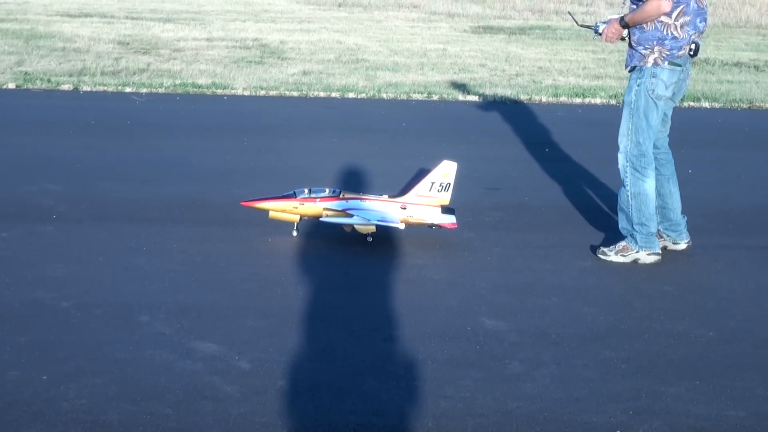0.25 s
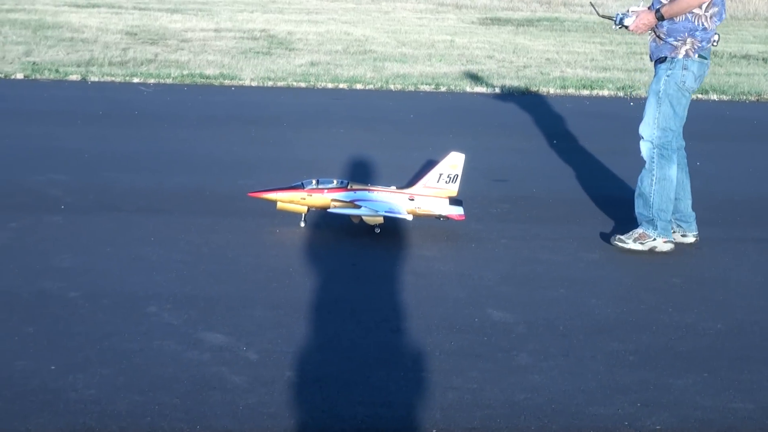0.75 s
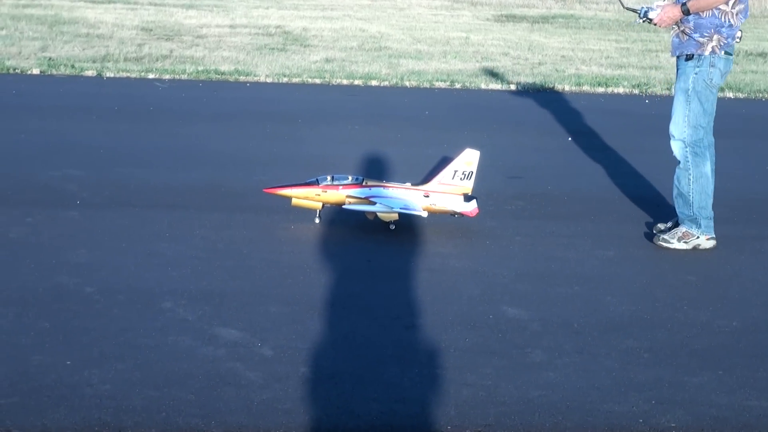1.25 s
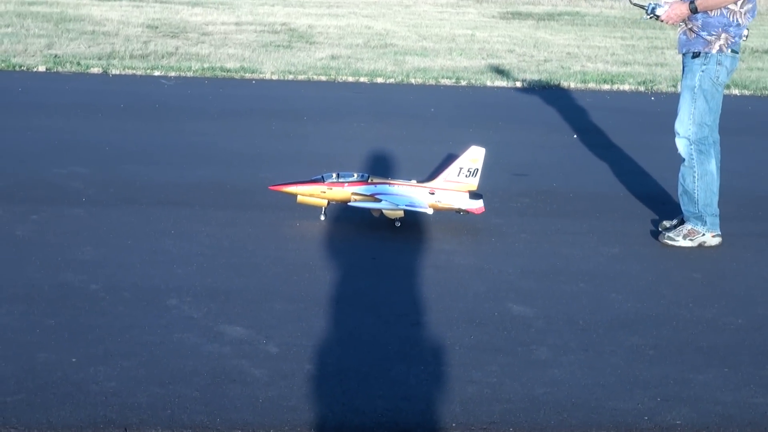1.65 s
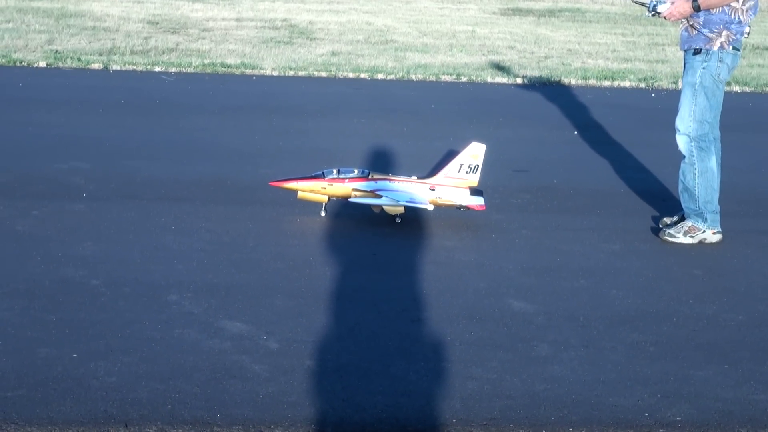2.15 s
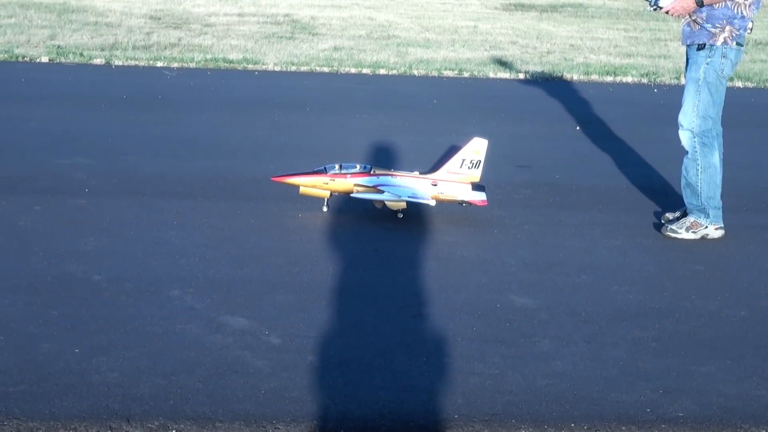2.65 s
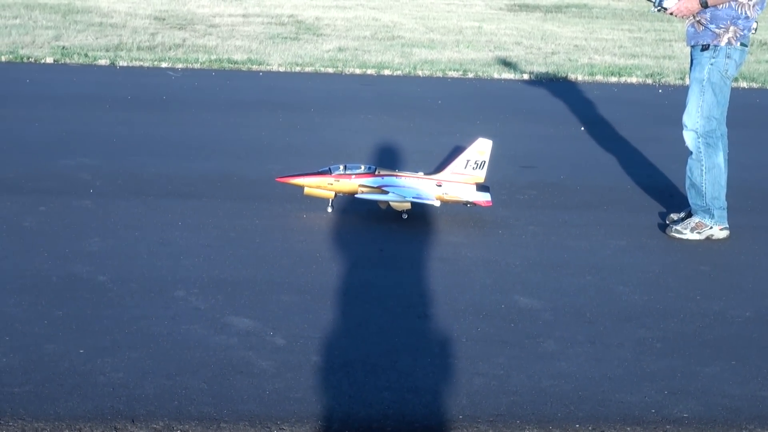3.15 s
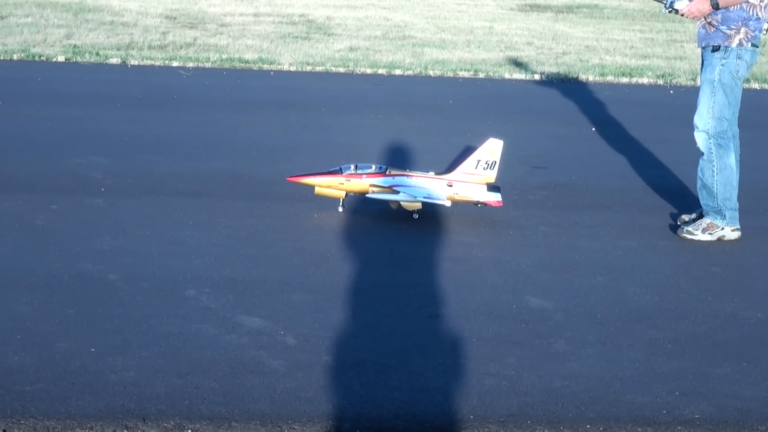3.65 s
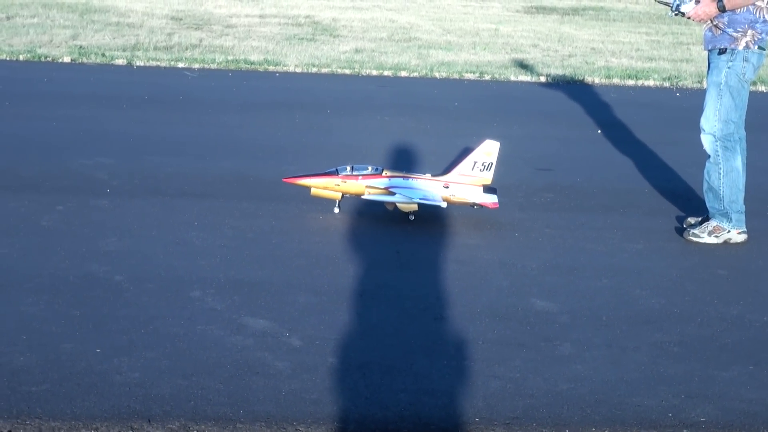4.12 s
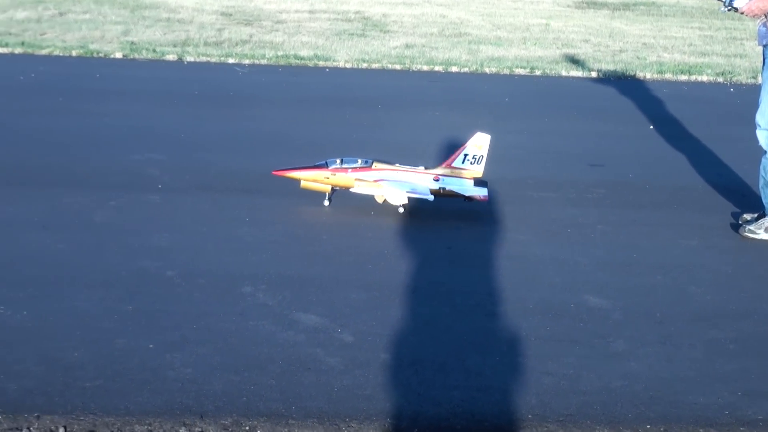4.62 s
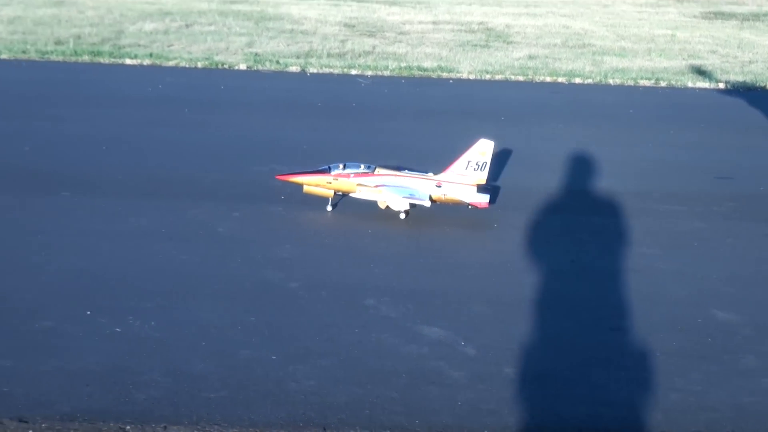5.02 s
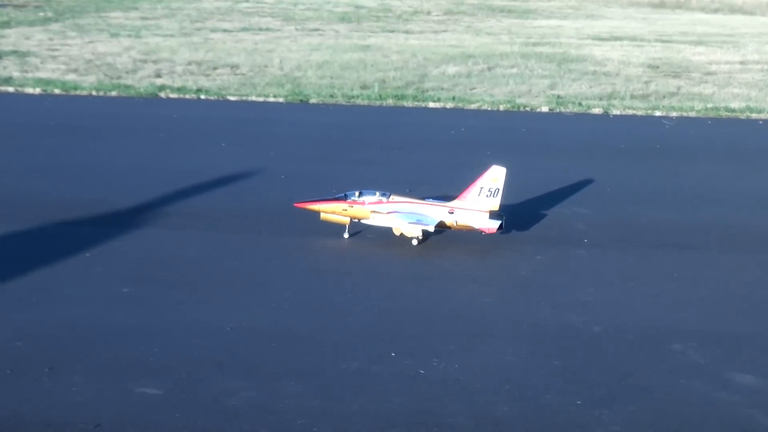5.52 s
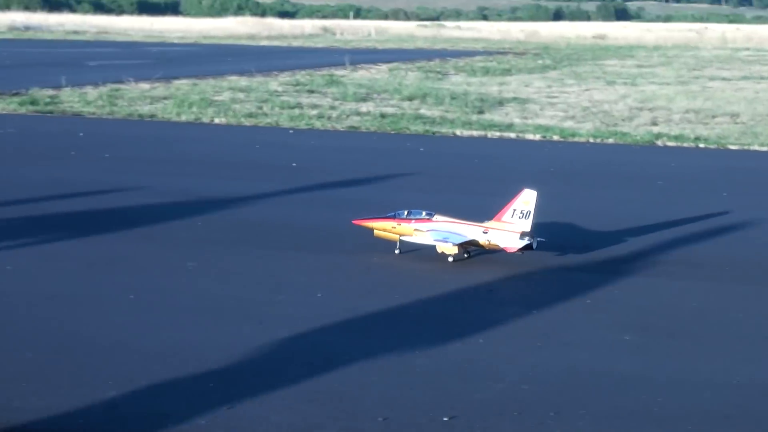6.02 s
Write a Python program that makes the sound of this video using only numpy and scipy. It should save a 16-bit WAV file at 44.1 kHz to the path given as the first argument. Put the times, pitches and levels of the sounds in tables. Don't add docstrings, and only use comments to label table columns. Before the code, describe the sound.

Tiny servos whirr in short bursts over a quiet field, then a model jet's motor chirps and its ducted fan spools into a rising hissing whine.

```python
import sys
import numpy as np
from scipy import signal
from scipy.fft import rfft, irfft, next_fast_len
from scipy.io import wavfile
from scipy.ndimage import uniform_filter1d, map_coordinates

SR = 44100
rng = np.random.default_rng(int(sys.argv[2]) if len(sys.argv) > 2 else 0)


def master_out(mix):
    frames = np.transpose(np.atleast_2d(mix))
    ceiling = np.clip(frames, -1, 1)
    pcm = np.round(ceiling * 32767).astype(np.int16)
    wavfile.write(sys.argv[1], SR, pcm)


def invert_db(level):
    return 10 ** (np.asarray(level, dtype=float) / 20)


N = 276948

# t/s, shaft f/Hz, unbalance level/dB, blade tone level/dB
FAN_RUN = [(3.66, 214.4, -57, -56), (3.73, 266.3, -44.5, -41.5), (3.81, 302.8, -47, -35.5),
           (3.97, 324, -40.5, -37), (4.16, 331.8, -41, -37), (4.27, 375, -38, -38.5),
           (4.4, 408.7, -36, -28.5), (4.56, 420.8, -43, -30.5), (4.72, 439.7, -36.5, -37.5),
           (4.87, 480, -36, -29), (5.02, 519.5, -46, -34), (5.33, 561.5, -28.5, -31), (5.57, 589, -34, -43),
           (5.68, 609, -30, -36), (5.78, 634.5, -19.5, -32), (6.0, 653.8, -19.5, -32.5),
           (6.07, 692, -20, -32), (6.28, 702.6, -21.5, -33.5)]
# shaft multiple, level at full speed/dB, growth/dB per dB of speed
SHAFT_ORDERS = [(2, -48, 2.5), (3, -50, 2), (4, -55, 1.5), (7, -56, 1), (10, -48, 2), (15, -50, 2),
                (20, -54, 1.8), (25, -58, 1.5), (30, -58, 1.2)]
# shaft multiple, shaft f/Hz, width/Hz, level/dB
CRITICAL_SPEEDS = [(2, 388, 45, -47), (2, 450, 27.5, -41.5), (2, 510, 36, -39.5), (2, 562, 43, -47),
                   (2, 605, 31.5, -36.5), (2, 637, 18.5, -37.5), (2, 697, 30, -41.5), (3, 279, 54, -40.5),
                   (3, 401.5, 20, -42.5), (3, 449, 46, -38), (3, 541, 91, -36.5), (3, 620, 70.5, -40),
                   (3, 698, 30, -40.5), (4, 324, 13, -47), (4, 438, 33, -43), (4, 548, 45, -36),
                   (4, 704, 14, -40), (7, 697, 24, -42.5), (10, 374, 18, -45.5), (10, 484, 40, -48),
                   (10, 604, 43, -38), (10, 643, 23, -35), (10, 698, 37, -37), (15, 491, 73, -44.5),
                   (15, 569, 16, -43), (15, 607, 30, -34), (15, 695, 82, -35.5), (20, 437, 24, -52),
                   (20, 570, 90, -46.5), (20, 697, 30, -50)]
# shaft multiple, level against the hiss/dB
UNEVEN_BLADES = [(6, -21), (9, -22.5), (11, -19), (13, -19), (14, -17), (18, -21)]
# f/Hz, width/Hz, level/dB
AIRFRAME_MODES = [(799, 176, 9), (1388, 230, 6.5), (3380, 990, -23), (4690, 550, -3.5)]
# f/Hz, width/Hz, level/dB
INTAKE_MODE = [(2280, 520, 0)]
# f/Hz, level/dB per Hz
ROAR_COLOUR = [(120, -42), (300, -2.5), (600, -3), (1000, 0.5), (3000, 1), (5500, -8), (8000, -33)]
# f/Hz, level/dB per Hz
HISS_COLOUR = [(2060, -24), (3500, 2), (4190, -9.5), (4890, -5.5), (5420, -14), (6010, -3.5), (6830, -8),
               (7470, -3.5), (8180, -7.5), (9060, -5.5), (10200, -4.5), (12600, -9.5), (15800, -30),
               (16300, -35)]
# f/Hz, level/dB per Hz
TYRE_COLOUR = [(80, -60), (130, -6), (250, 0), (450, -3), (800, -30)]
# t/s, shaft f/Hz, commutation whistle level/dB, its half-frequency level/dB
MOTOR_RUN_UP = [(3.54, 58, -41, -58), (3.578, 107, -42, -50), (3.606, 147, -28, -43),
                (3.627, 167, -45, -47), (3.652, 190, -38, -36), (3.67, 210, -68, -60),
                (3.692, 235, -56, -42), (3.732, 262, -45, -64), (3.75, 273, -66, -66)]
# start t/s, end t/s, f/Hz, level/dB, octave level/dB
SWITCHING_STEPS = [
    (3.475, 3.536, 2965, -52, -48),
    (3.536, 3.556, 3060, -38, -47),
    (3.556, 3.583, 3352, -31, -56),
    (3.575, 3.597, 3895, -41, -57),
    (3.595, 3.62, 4950, -37, -55),
    (3.617, 3.638, 7440, -48, -80),
]
# start t/s, end t/s, start f/Hz, end f/Hz, level/dB
BEAT_WHISTLES = [(3.505, 3.54, 2800, 2600, -38), (3.51, 3.555, 2280, 2100, -39),
                 (3.618, 3.64, 4620, 4200, -43), (3.6, 3.62, 2240, 2200, -36), (3.6, 3.64, 1545, 1585, -38),
                 (3.505, 3.545, 1490, 1540, -40), (3.52, 3.66, 765, 782, -43),
                 (3.617, 3.638, 6400, 6300, -54), (3.535, 3.556, 12240, 12240, -58),
                 (3.63, 3.65, 11700, 11600, -59), (3.475, 3.487, 2780, 2700, -46),
                 (3.59, 3.598, 6200, 6200, -50)]
# t/s, hold/s, level/dB, release/dB per s
ROTOR_KICKS = [
    (3.475, .004, -42, 800),
    (3.505, .135, -37.5, 500),
]
# f/Hz, level/dB per Hz
JUDDER_SPECTRUM = [(500, -40), (750, -9), (1400, -1), (2500, -1.5), (4700, -6), (6000, -19), (7300, -22),
                   (8800, -10.5), (10200, -22), (11800, -12), (15000, -40)]
# start t/s, full speed t/s, end t/s, top gear mesh f/Hz, level/dB
SERVO_STROKES = [
    (-.04, .03, .082, 3350, -52),
    (.6, .664, .715, 3080, -53.5),
    (.752, .809, .893, 5020, -51.5),
    (.972, 1.03, 1.108, 5020, -52.5),
    (1.127, 1.181, 1.272, 3470, -52),
    (1.37, 1.445, 1.555, 5300, -51.5),
    (1.635, 1.70, 1.78, 5200, -53),
    (1.805, 1.855, 1.895, 3990, -55),
]
# multiple, level/dB
MESH_HARMONICS = [(1, 2.5), (2, 10), (3, 3), (4, -9), (5, -13)]
# f/Hz, width/Hz, level/dB
CASE_MODES = [(2200, 250, -9), (3450, 220, -6), (4400, 250, -4), (4980, 220, 1), (6300, 350, 1),
              (7050, 350, -2), (9400, 600, -2), (10200, 400, -4), (11600, 450, -8), (12700, 500, -9)]
# f/Hz, width/Hz, level/dB
LINKAGE_MODES = [(670, 980, 2.5), (1330, 570, 8.5), (2080, 130, 2), (2650, 150, -17)]
# t/s, peak level/dB
FLAP_STOPS = [
    (1.482, -41.5),
    (1.7714, -44),
    (1.8776, -41),
]
# f/Hz, level/dB
ENGINE_TONES = [(117.8, 0), (236, -13), (353, -11), (471, -12), (511, -19), (550, -21)]
# t/s, lowest tone level/dB, left minus right/dB
ENGINE_LEVEL = [(0, -50, 0.1), (1.5, -53, 0.5), (3.5, -53, 0), (4.16, -48.5, 1.5), (4.9, -50.5, 1.5),
                (5.63, -48, 2), (6, -48, 8), (6.28, -51, 7)]
# start t/s, end t/s, f/Hz, width/Hz, level/dB
INSECTS = [
    (0, 1, 1650, 30, -75),
    (.3, 1.3, 3050, 160, -80),
    (0, .6, 2880, 120, -81),
    (1.6, 3.5, 2832, 25, -78),
    (1.9, 3.5, 5665, 60, -85),
    (2.7, 3.5, 5810, 80, -85),
]
# f/Hz, level/dB per Hz
HUSH_COLOUR = [(25, -11), (60, -4.5), (100, 2), (170, 2), (300, -0.5), (470, 0.5), (700, -4.5),
               (1500, -10.5), (2900, -16), (4700, -20), (11000, -25.5), (13000, -21.5), (16300, -28)]
# f/Hz, correlation
PORT_LIKENESS = [(130, .999), (290, .93), (640, .6), (1200, .02), (16000, .02)]
# t/s, left minus right/dB
JET_PAN = [(0, -.8), (3.5, -1), (6.3, -1.2)]
# f/Hz, level against the common part/dB
GROUND_SCATTER = [(100, -14), (250, -17), (500, -29), (800, -28), (2400, -25), (5000, -21), (9000, -17)]


def fan():
    shaft, unbalance_db, blade_db, gate = curves(FAN_RUN)
    speed_db = 20 * np.log10(shaft / 700)
    roar_db, hiss_db = -35.5 + 1.8 * speed_db, -32 + 2.85 * speed_db
    tones = rotor_tones(shaft, speed_db, unbalance_db, blade_db, hiss_db)
    air = duct_roar(roar_db) + blade_hiss(shaft, hiss_db) + intake(roar_db)
    return gate * tones + air_on() * air


def rotor_tones(shaft, speed_db, unbalance_db, blade_db, hiss_db):
    sizes = [(1, invert_db(unbalance_db)), (5, invert_db(blade_db))]
    for order, db, grows in SHAFT_ORDERS:
        modes = [c[1:] for c in CRITICAL_SPEEDS if c[0] == order]
        size = invert_db(db + grows * speed_db) + ringing(modes, shaft)
        sizes.append((order, invert_db(wobble(8)) * size))
    tones = np.zeros(N)
    for order, size in sizes:
        tones += size * tone(order * shaft, flutter_db=0.67 + 0.051 * order, rate=60, smear=0.036 * order)
    for order, db in UNEVEN_BLADES:
        size = invert_db(hiss_db + db + 4 * wobble(4) - 2)
        tones += size * tone(order * shaft, flutter_db=3.5, rate=70, smear=0.052 * order)
    return filtered(tones, lambda f: 1 / (1 + (f / 14300) ** 12))


def duct_roar(roar_db):
    airframe = resonant(AIRFRAME_MODES, through_db=-12)
    return invert_db(roar_db + 6 + 0.6 * wobble(25)) * noise(lambda f: invert_db(along(ROAR_COLOUR, f)) * airframe(f))


def blade_hiss(shaft, hiss_db):
    swish = 1 + 0.1 * np.sin(2 * np.pi * np.cumsum(shaft) / SR)
    gusts_db = 0.5 * wobble(30)
    air = patchy(noise(lambda f: invert_db(along(HISS_COLOUR, f))), depth_db=2.0, wide=2.4, long=23)
    hiss = invert_db(hiss_db + 2.5 + gusts_db) * swish * air
    treble = filtered(hiss, lambda f: 1 / (1 + (10500 / (f + 1)) ** 6))
    dulling = invert_db(-7 * (1 - shaft / 700)) - 1
    return hiss + dulling * treble


def intake(roar_db):
    since_side_on = np.arange(N) / SR - 5.03
    passing_db = np.minimum(9.5 * since_side_on, -19 * since_side_on)
    facing_db = np.maximum(4 + passing_db, -13.5)
    rush = noise(lambda f: resonant(INTAKE_MODE, through_db=-60)(f) ** 2)
    return invert_db(roar_db + facing_db + 1.2 * wobble(12)) * rush


def tyres():
    rolling = np.maximum(np.arange(N) / SR - 4, 0)
    bumps_db = 3 * wobble(20) + 1.5 * wobble(8)
    rumble = noise(lambda f: invert_db(along(TYRE_COLOUR, f)))
    return air_on() * invert_db(-72.5 + 10 * rolling + 3.0 + bumps_db) * rumble


def air_on():
    return np.clip((np.arange(N) / SR - 3.62) / .012, 0, 1)


def motor_start():
    shaft, step_db, half_db, gate = curves(MOTOR_RUN_UP)
    t = np.arange(N) / SR
    commutation = invert_db(step_db) * tone(18 * shaft, flutter_db=2.5, rate=110)
    commutation += invert_db(half_db) * tone(9 * shaft, flutter_db=3, rate=110)
    whistles = list(BEAT_WHISTLES)
    for s0, s1, hz, db, octave_db in SWITCHING_STEPS:
        whistles += [(s0, s1, hz, hz, db), (s0, s1, 2 * hz, 2 * hz, octave_db)]
    x = gate * commutation
    for s0, s1, hz0, hz1, db in whistles:
        on = np.clip(np.minimum((t - s0) / .001, (s1 - t) / .004), 0, 1)
        glide = np.interp(t, [s0, s1], [hz0, hz1])
        x += on * invert_db(db - 1.5) * tone(glide, flutter_db=2.2, rate=160, smear=.5)
    return x + judder()


def judder():
    t = np.arange(N) / SR
    kicks = np.zeros(N)
    for s, hold, db, fall in ROTOR_KICKS:
        kicks += (t > s) * invert_db(db - fall * np.clip(t - s - hold, 0, 1))
    body = resonant(list(AIRFRAME_MODES) + list(INTAKE_MODE), through_db=-10)
    rattle = noise(lambda f: invert_db(along(JUDDER_SPECTRUM, f)) * body(f))
    return kicks * invert_db(2.9 * wobble(150)) * patchy(rattle, depth_db=-1.5, wide=3, long=3)


def servos():
    strokes = [curves(stroke(*row, shaded=int(k >= 5))) for k, row in enumerate(SERVO_STROKES)]
    mesh, gear_db, scrape_db, shade_db = (sum((s[-1] > 0) * s[k] for s in strokes) for k in range(4))
    gate = sum(s[-1] for s in strokes)
    load_db = .7 * np.minimum(gear_db + 52, 0)
    gears = invert_db(-1.5) * tooth_noise() + invert_db(-10 + load_db + .6 * shade_db) * mesh_whine(mesh)
    gears = gears + (invert_db(shade_db) - 1) * filtered(gears, lambda f: f > 7500)
    return gate * invert_db(gear_db) * (gears + invert_db(scrape_db) * linkage_scrape(mesh)) + 0.4 * stop_knocks()


def servo_case(f):
    return resonant(CASE_MODES, through_db=-17)(f) / (1 + (f / 13200) ** 12)


def mesh_whine(mesh):
    teeth = sum(invert_db(db) * tone(k * mesh, flutter_db=5.5, rate=420, smear=1.4) for k, db in MESH_HARMONICS)
    return unit(filtered(teeth, servo_case))


def tooth_noise():
    rubbing = invert_db(1.1 * wobble(900)) * noise(lambda f: servo_case(f) * (f > 2000))
    return patchy(rubbing, depth_db=6.0, wide=3, long=14)


def linkage_scrape(mesh):
    linkage = resonant(LINKAGE_MODES, through_db=-30)
    rubbing = invert_db(3.0 * wobble(600)) * noise(lambda f: linkage(f) * (f > 450))
    return patchy(rubbing, depth_db=3.5, wide=3, long=6) + .28 * tone(.4 * mesh, flutter_db=5, rate=140, smear=1.5)


def stop_knocks():
    knocks = np.zeros(N)
    t = np.arange(SR // 20) / SR
    ring = sum(np.sin(2 * np.pi * hz * t) * invert_db(db) for hz, _, db in LINKAGE_MODES)
    for s, db in FLAP_STOPS:
        knocks[round(s * SR):][:len(t)] += invert_db(db - 60 * t / 0.018) * ring
    return knocks


def stroke(start, full, end, top_hz, db, shaded):
    crawl_hz, slowest_hz = 3000, 2050
    take_up, shift, hold, stop = .026, .02, .022, .008
    brake = (50000, 20000)[shaded]
    scrape_db, shade_db, sag_db = [(-7.5, -0.5, -0.5), (-3, -5, -6.5)][shaded]
    slowed = min(full + hold + (top_hz - slowest_hz) / brake, end - 2 * stop)
    s = np.array([start, start + take_up - stop, start + take_up, full - shift, full, full + hold,
                  slowed, end - stop, end])
    braked = np.maximum(top_hz - brake * (s[6:] - s[5]), slowest_hz)
    hz = [crawl_hz, crawl_hz, crawl_hz, min(1.14 * crawl_hz, top_hz), top_hz, top_hz, *braked]
    under_db = np.array([-12, -12, -4, -2, 0, 0, sag_db, sag_db, -9])
    return np.transpose([s, hz, db + under_db, scrape_db - 0.75 * under_db, shade_db + 0 * s])


def spread(x, pan_db):
    scatter = rng.standard_normal(6000) * invert_db(-60 * np.arange(6000) / SR / .12)
    stray = signal.fftconvolve(x, scatter / np.linalg.norm(scatter))[:N]
    lean = filtered(x * np.tanh(pan_db * np.log(10) / 40), lambda f: 1 / (1 + (f / 6000) ** 2))
    side = filtered(stray, lambda f: invert_db(along(GROUND_SCATTER, f))) + lean
    return np.array([x + side, x - side])


def far_engine():
    firing = 1 + 0.00286 * wobble(1.5)
    drone = sum(invert_db(db) * tone(hz * firing, flutter_db=.25 + (hz > 200) * 2.6, rate=7) for hz, db in ENGINE_TONES)
    level_db, pan_db, _ = curves(ENGINE_LEVEL)
    return invert_db(level_db + np.array([pan_db, -pan_db]) / 2) * drone


def insects():
    t = np.arange(N) / SR
    song = np.zeros(N)
    for s0, s1, hz, width, db in INSECTS:
        on = np.clip(np.minimum(t - s0 + .1, s1 - t) / .15, 0, 1)
        song += on * invert_db(db) * tone(hz + width / 4 * wobble(width), flutter_db=1.5, rate=4)
    return song


def hush():
    turn = lambda f: np.arccos(along(PORT_LIKENESS, f)) / 2
    pair = rng.standard_normal((2, N))
    mid, side = filtered(pair, lambda f: invert_db(along(HUSH_COLOUR, f)) * [np.cos(turn(f)), np.sin(turn(f))])
    ports = unit(np.array([mid + side, mid - side])) * invert_db([[.6], [-.6]])
    return invert_db(-55.5 + 0.16 * wobble(2.72)) * ports


def unit(x):
    return x / np.sqrt(np.mean(x ** 2) + 1e-20)


def along(points, hz):
    f, v = np.transpose(points)
    return np.interp(np.log(hz + 1), np.log(f + 1), v)


def curves(rows):
    s, *cols = np.transpose(rows)
    t = np.arange(N) / SR
    since_start = t - s[0] + (s[0] < .01)
    until_end = s[-1] - t + (s[-1] > 6.2)
    gate = np.clip(np.minimum(since_start, until_end) / .012, 0, 1)
    return [np.interp(t, s, c) for c in cols] + [gate]


def wobble(rate):
    knots = rng.standard_normal(int(N * rate / SR) + 4)
    return map_coordinates(knots, [np.arange(N) * rate / SR])


def filtered(x, response):
    m = next_fast_len(N + SR // 4)
    return irfft(rfft(x, m) * response(np.fft.rfftfreq(m, 1 / SR)), m)[..., :N]


def resonant(modes, through_db):
    def response(f):
        rings = sum(invert_db(db) * 1j * f * w / (c * c - f * f + 1j * f * w) for c, w, db in modes)
        return invert_db(through_db) + abs(rings)
    return response


def ringing(modes, hz):
    return sum(invert_db(db) / (1 + (2 * (hz - c) / w) ** 2) ** 2 for c, w, db in modes)


def noise(response):
    return unit(filtered(rng.standard_normal(N), response))


def tone(hz, flutter_db, rate, smear=0):
    phase = 2 * np.pi * (np.cumsum(hz) / SR + rng.random()) + smear * wobble(rate)
    return np.sqrt(2) * invert_db(flutter_db * wobble(rate)) * np.sin(phase) * (hz < SR / 2)


def patchy(x, depth_db, wide, long):
    z = signal.stft(x, nperseg=256)[2]
    patches = uniform_filter1d(rng.standard_normal(z.shape), round(wide), axis=0)
    patches = uniform_filter1d(patches, round(long), axis=1)
    return unit(signal.istft(z * invert_db(depth_db * unit(patches)), nperseg=256)[1][:N])


def scene():
    jet = fan() + tyres() + motor_start() + servos()
    return spread(jet, curves(JET_PAN)[0]) + far_engine() + insects() + hush()


def top_cut(x):
    return signal.sosfilt(signal.butter(12, 16420, fs=SR, output="sos"), x)


def record(dry):
    mid = filtered(dry.mean(0), lambda f: f < 16400)
    side = filtered((dry[0] - dry[1]) / 2, lambda f: f < 11500)
    return top_cut(np.array([mid + side, mid - side]))


dry = scene()
out = record(dry)
master_out(out)
```